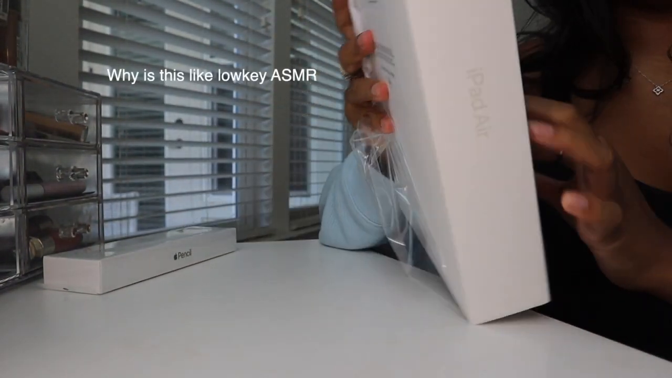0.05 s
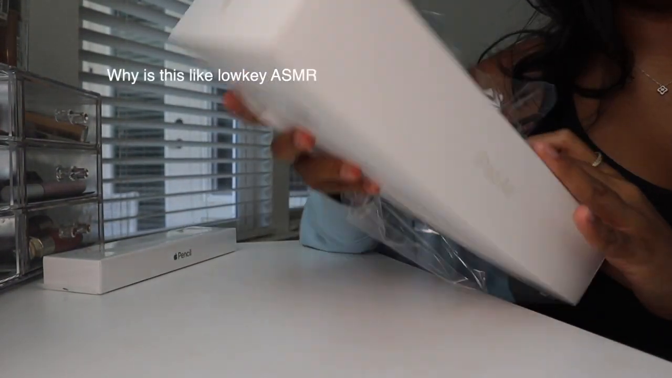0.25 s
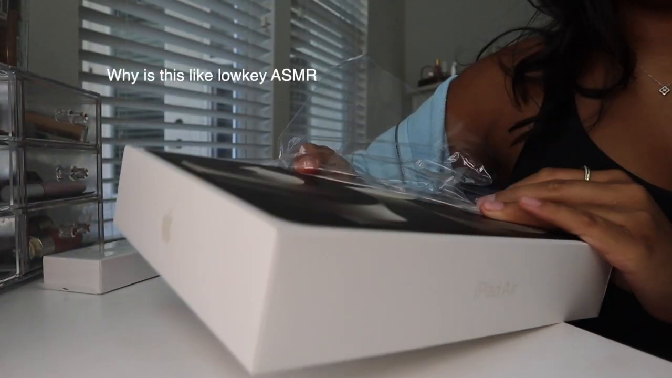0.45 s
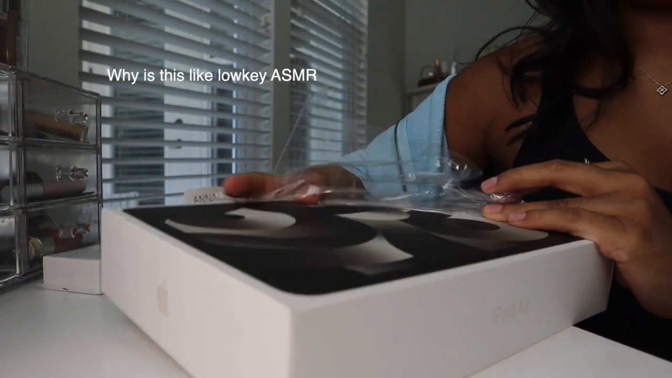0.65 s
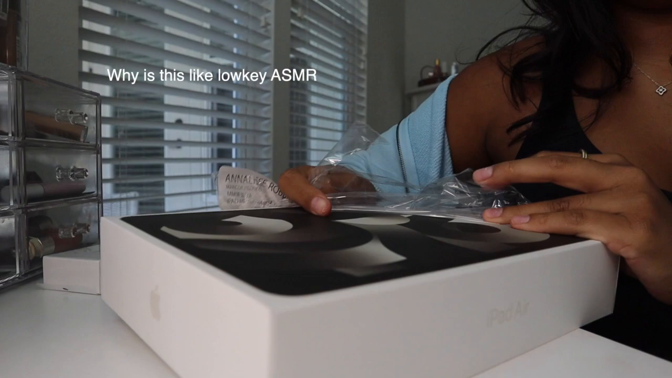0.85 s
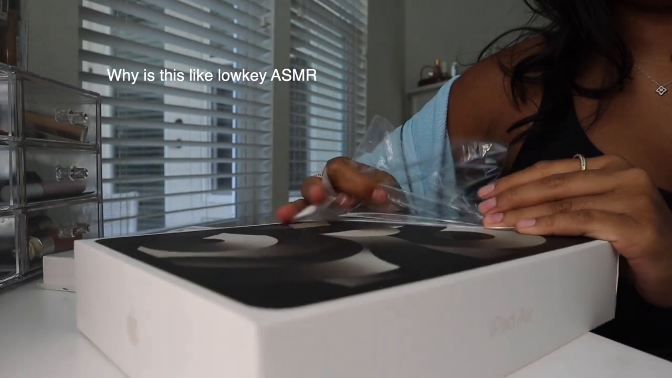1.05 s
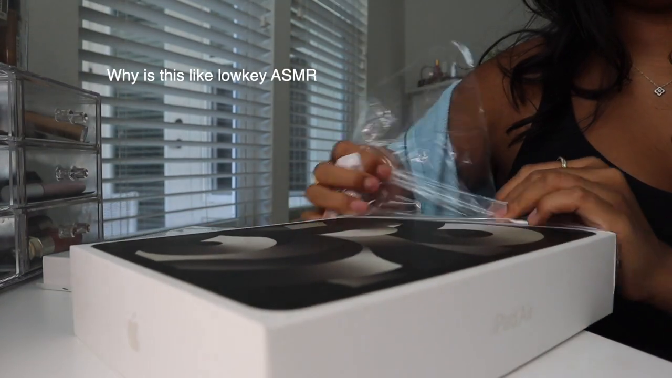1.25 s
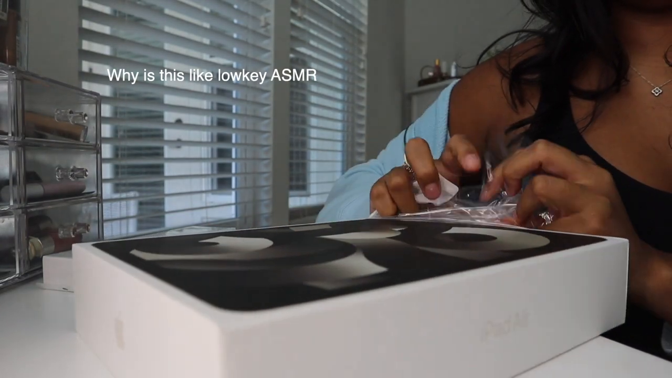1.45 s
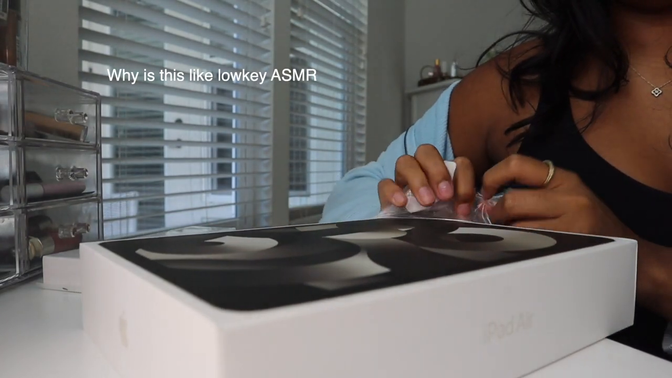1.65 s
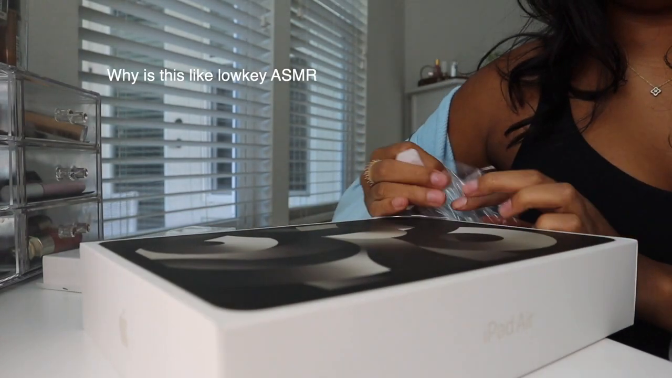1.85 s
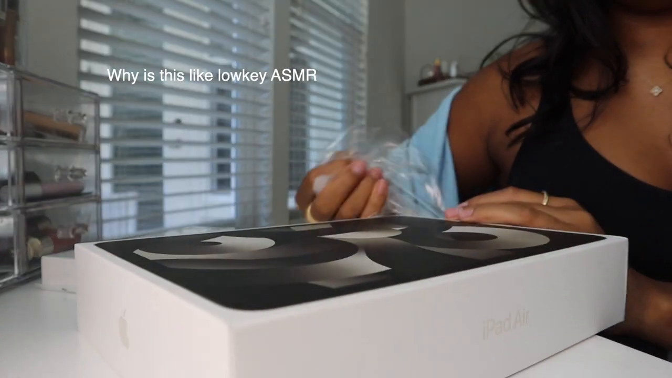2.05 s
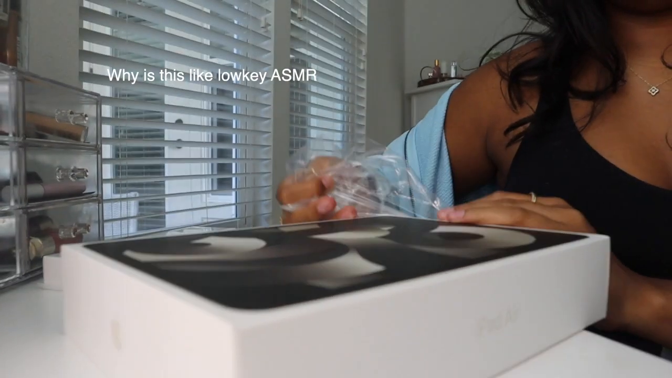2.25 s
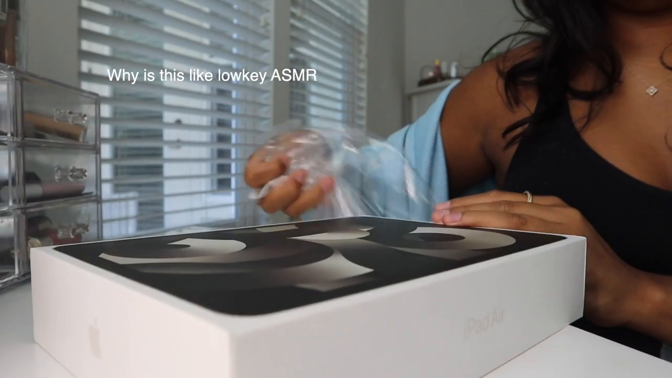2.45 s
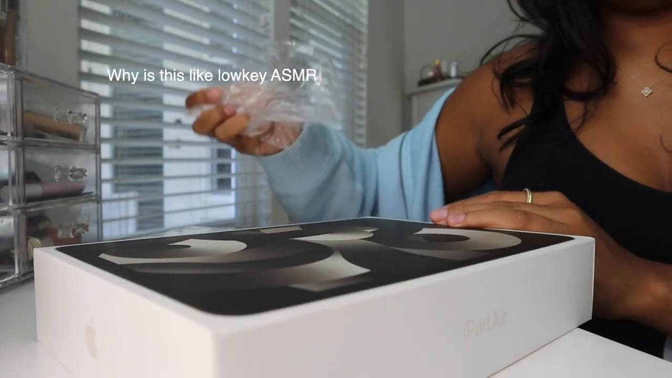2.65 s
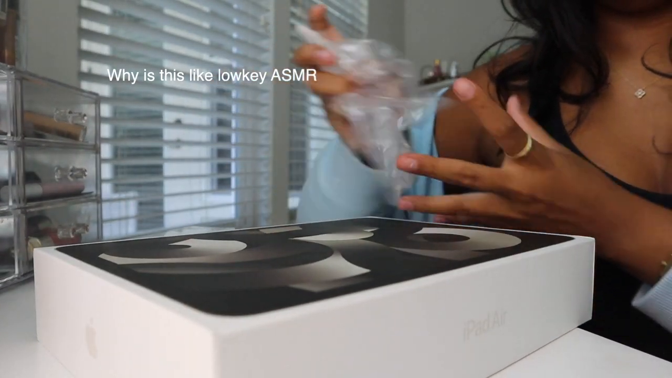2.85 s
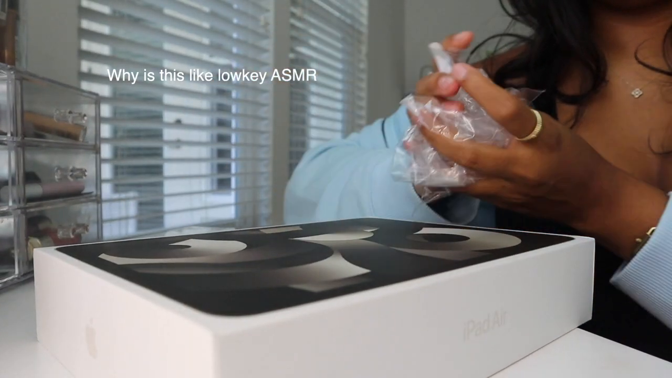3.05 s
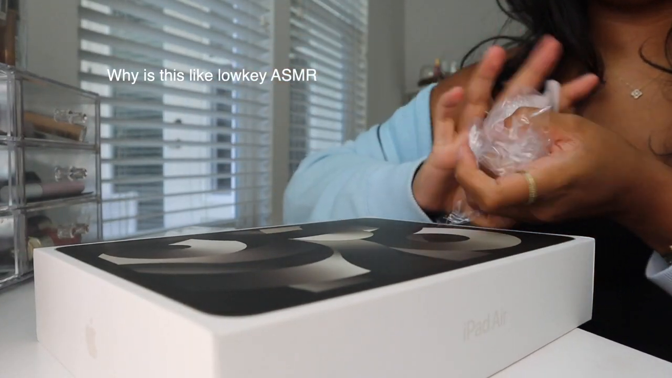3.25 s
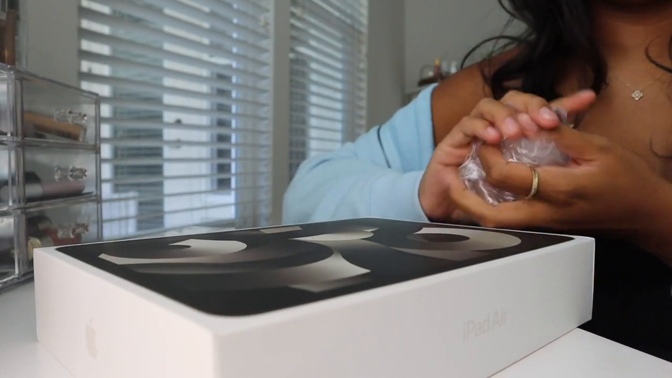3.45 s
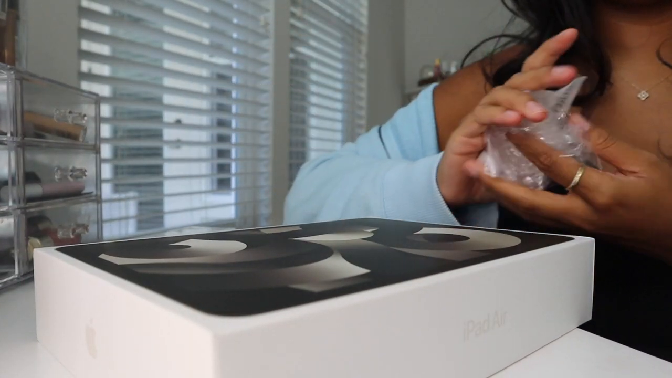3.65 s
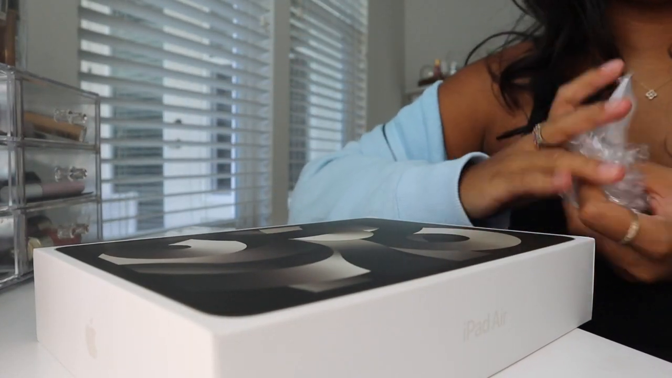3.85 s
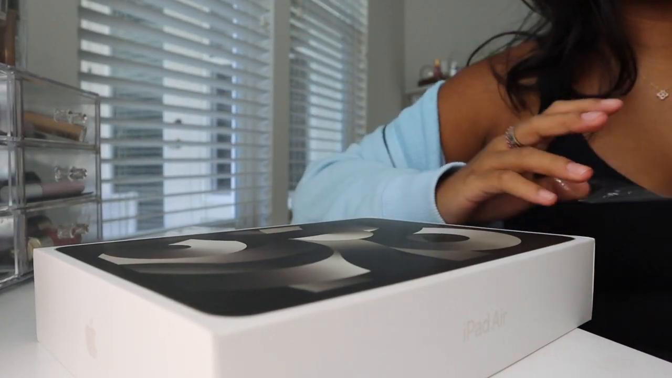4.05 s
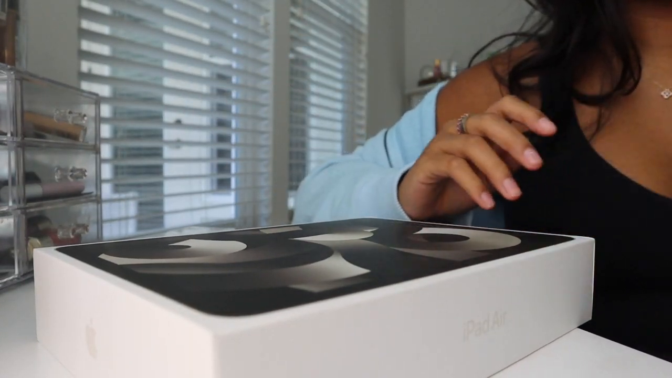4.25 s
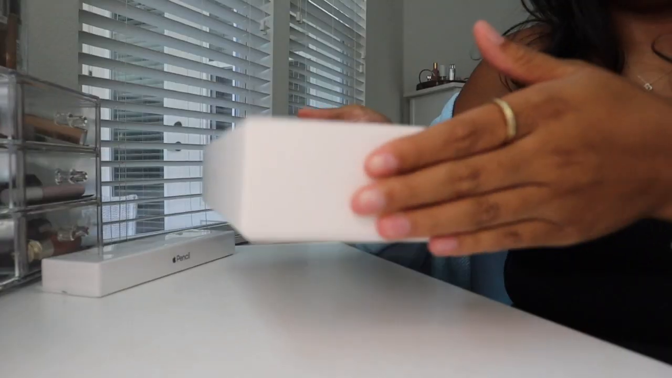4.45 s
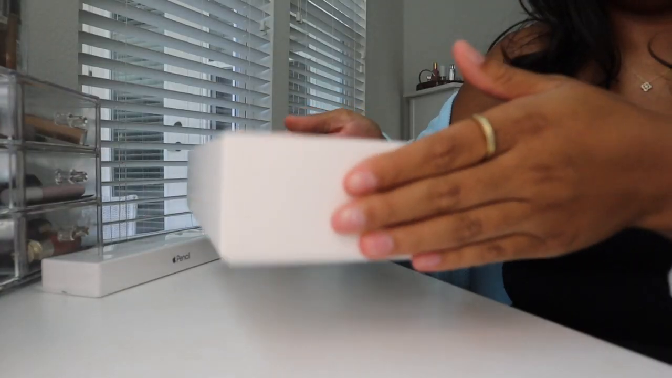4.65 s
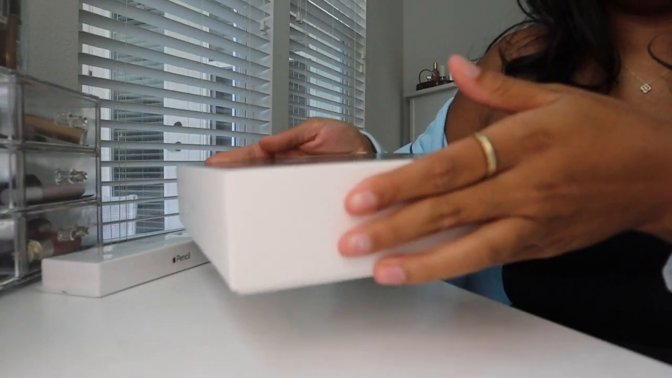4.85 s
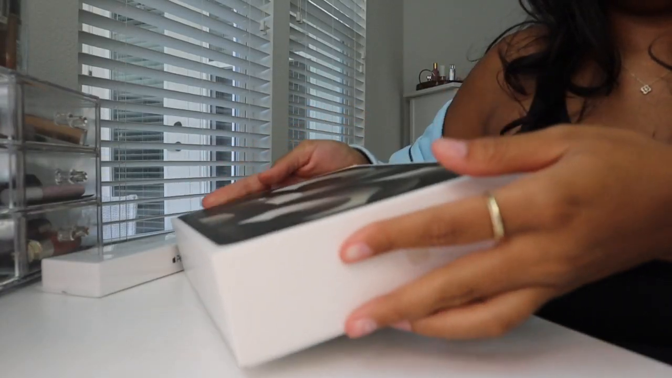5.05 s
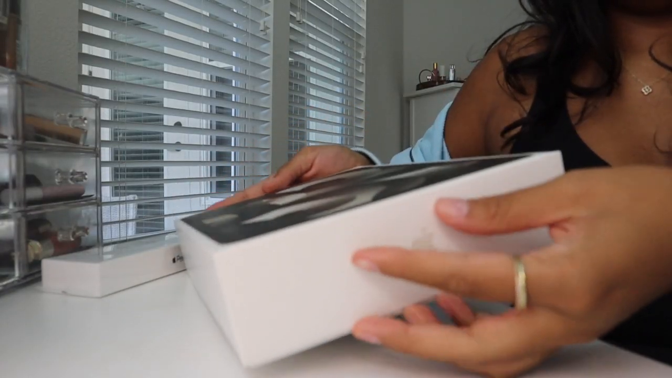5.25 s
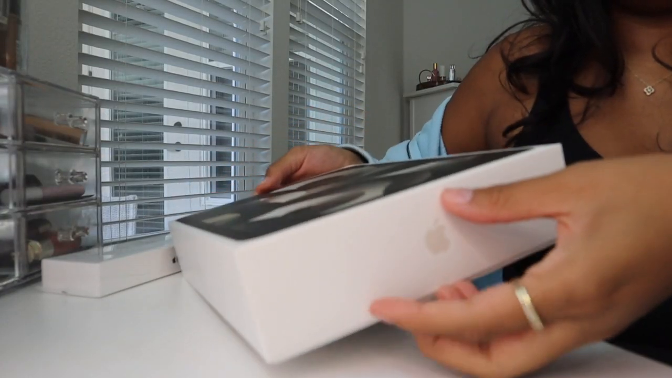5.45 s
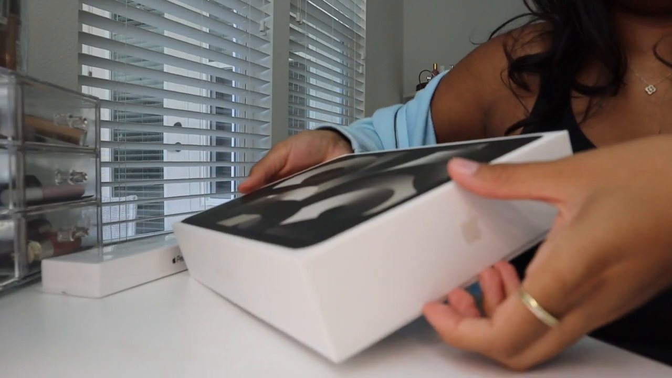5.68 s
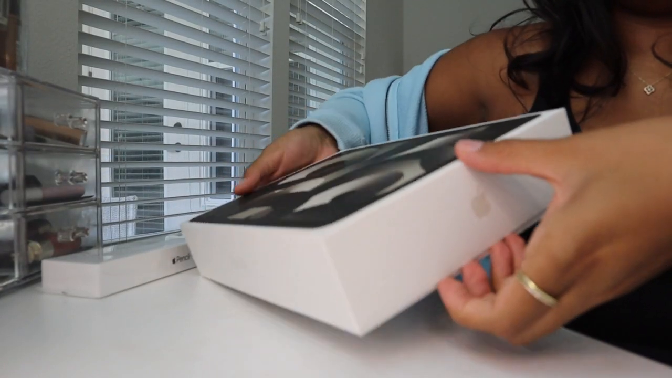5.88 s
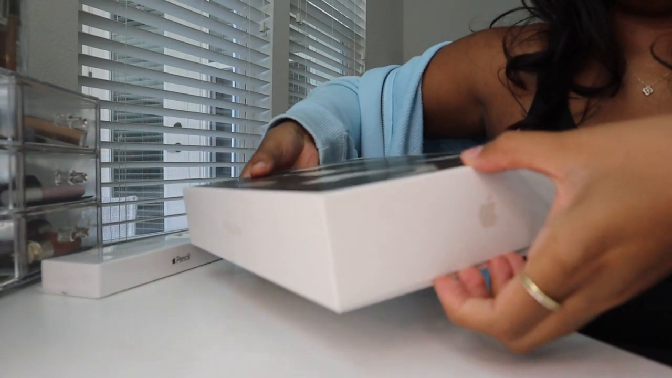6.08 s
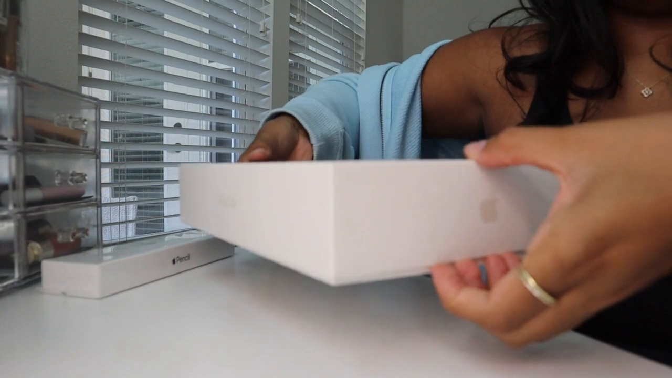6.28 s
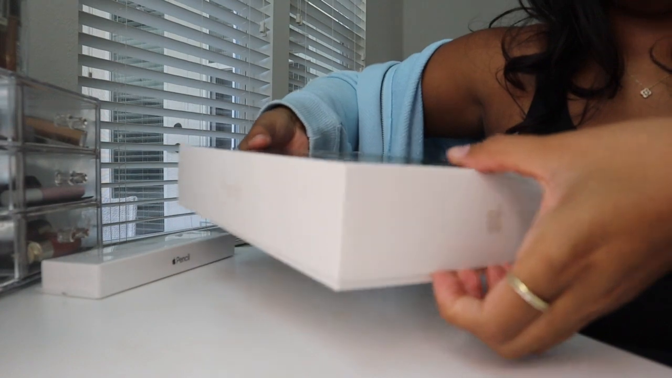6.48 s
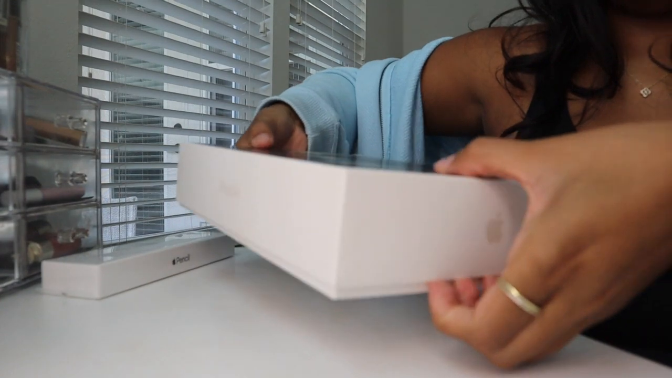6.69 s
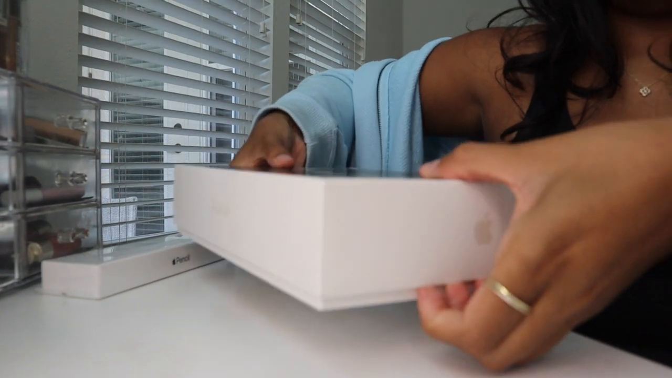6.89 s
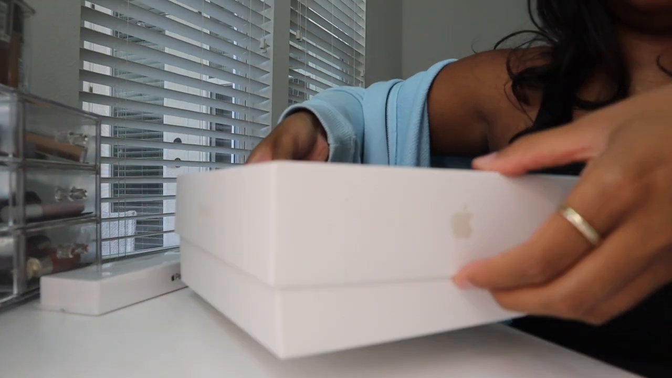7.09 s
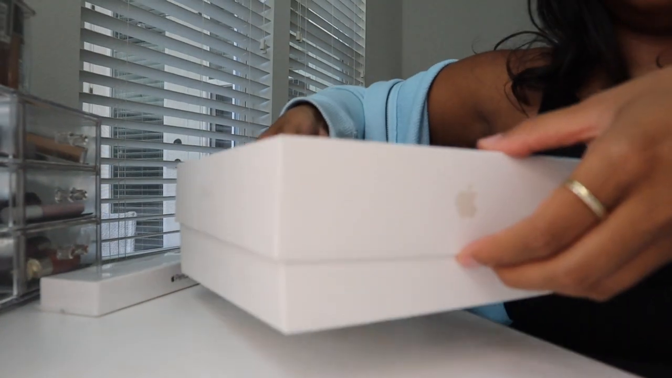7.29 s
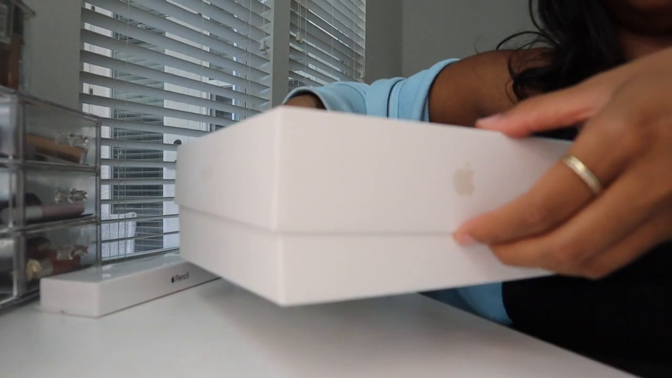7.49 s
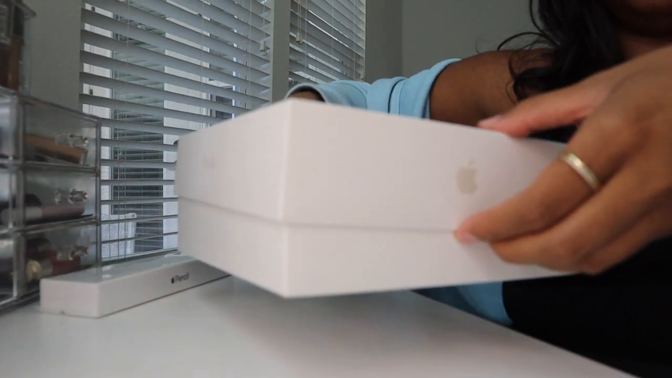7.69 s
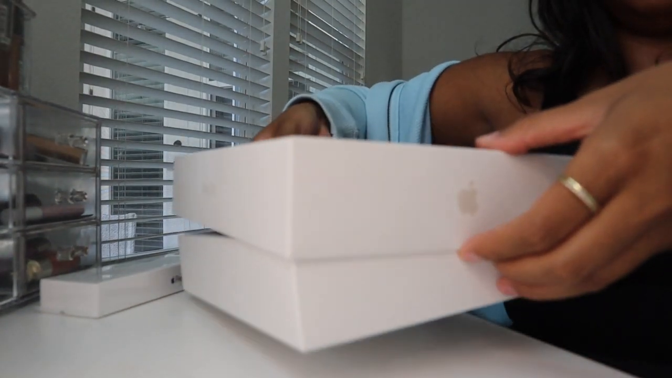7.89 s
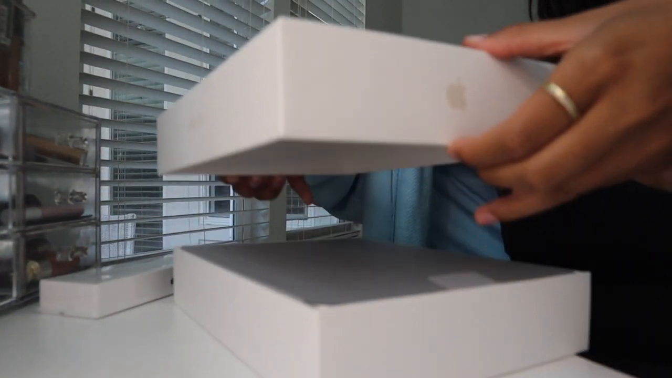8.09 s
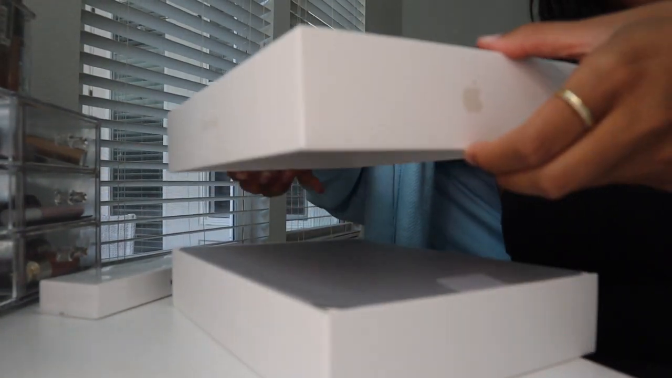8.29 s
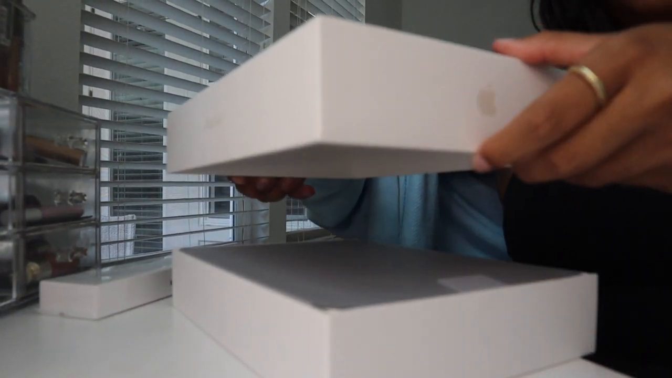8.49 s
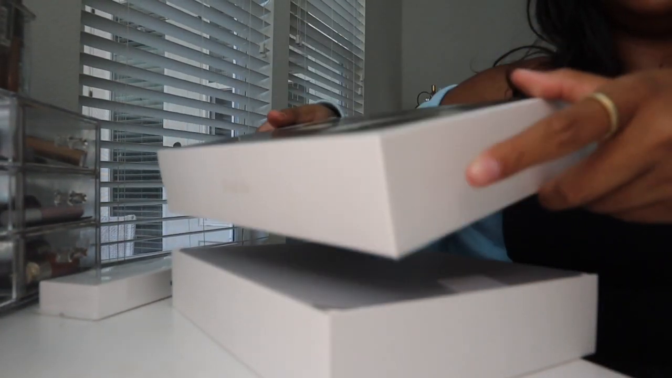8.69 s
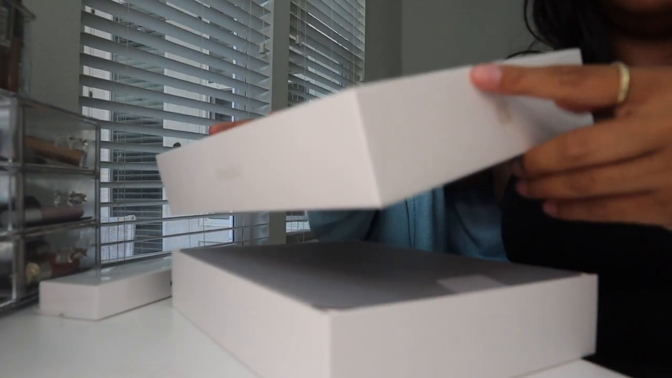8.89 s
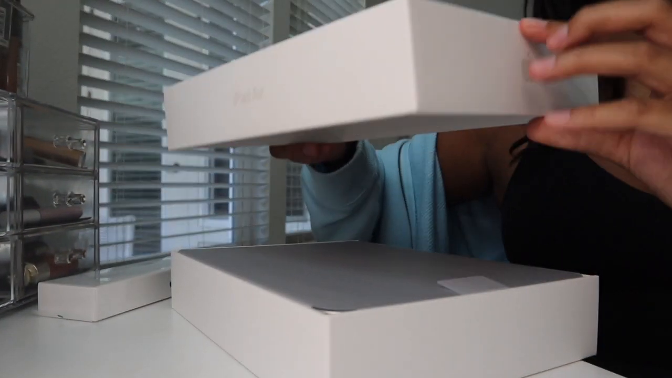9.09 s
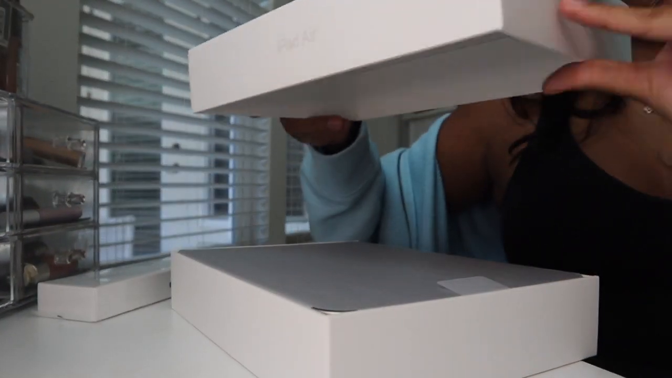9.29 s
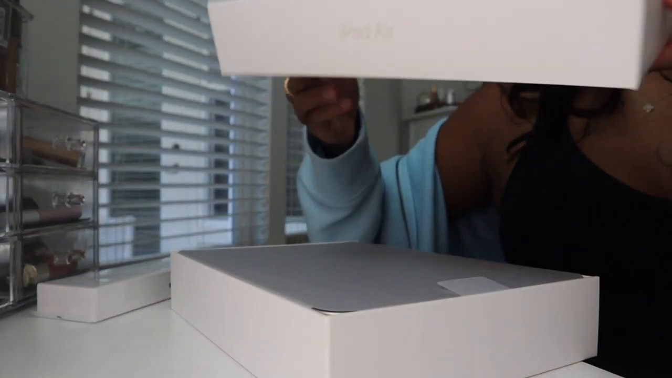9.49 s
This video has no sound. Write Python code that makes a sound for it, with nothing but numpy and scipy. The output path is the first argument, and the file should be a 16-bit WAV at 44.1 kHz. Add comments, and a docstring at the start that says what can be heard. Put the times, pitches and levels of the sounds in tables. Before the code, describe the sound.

Bright, uneven crinkling in bursts with sharp clicks and early boxy thuds, then denser crunching as the film is squeezed up. After it stops, hollow card knocks and quiet skin brushing, a near-silent pause, a low stuttering creak, and a loud scraping clunk onto the desk. Light card swishes fade into quiet room tone. Close stereo pickup, small indoor room, short reverberation.

```python
"""Close to a stereo camera microphone in a small room, plastic wrap is pulled off a cardboard box on a desk:
filtered random impulses crackle, snaps click and shiver, and damped modes knock as the box is turned.
The film is balled up and put aside; more knocks follow, and fingers brush the card in fine grains.
Then the tray squeaks and creaks down the lid by stick and slip, scrapes free, drops on the desk and skids.
Light swishes and a last brush of the fingers close it; dull air and a fan hum lie behind it all."""
import sys
import numpy as np
from scipy import signal
from scipy.fft import rfft, irfft, next_fast_len
from scipy.io import wavfile
from scipy.ndimage import uniform_filter1d

SR = 44100
rng = np.random.default_rng(int(sys.argv[2]) if len(sys.argv) > 2 else 0)


def generate_wav(signal):
    """Clip the signal to [-1, 1] and save it as 16-bit WAV at the path in sys.argv[1]."""
    frames = np.transpose(np.atleast_2d(signal))
    scaled = np.clip(frames, -1, 1) * 32767
    pcm = np.round(scaled).astype(np.int16)
    wavfile.write(sys.argv[1], SR, pcm)


N = 420273
T = np.arange(N) / SR
RING = T[:SR // 2]  # time axis of one blow or room tail
RING_HZ = np.arange(len(RING) // 2 + 1) * SR / len(RING)
PUT_ASIDE_S = 4.38  # the film is put aside

# colour of small creases in the film: [f/Hz, level/dB]
CREASE_COLOUR = [(900, -22), (2000, -2.5), (3000, -2), (4100, 0.5), (6200, -3), (8500, -4.5), (11000, -2),
                 (12500, -4.5), (14000, -22), (15500, -52)]
# colour of large folds in the film: [f/Hz, level/dB]
FOLD_COLOUR = [(300, -8.5), (600, 0.5), (1000, 3.5), (1400, 3.5), (2000, -5.5), (3000, -17), (6000, -42.5)]
# loud snaps of the film: [t/s, level/dB before the gain of clicks(), body re treble/dB before its
# body_db, ring of the buckling facet f/Hz]
FILM_SNAPS = [(0.1026, -13, -9, 2960), (0.2999, -13.5, -11, 2300), (0.4032, -13, -8, 1740),
              (0.507, -6, -19, 3960), (0.5761, -18, -20, 10100), (0.9258, -15, -34, 5850),
              (1.104, -10, -24, 4400), (1.156, -14.5, -14, 4200), (1.245, -19, -19.5, 4700),
              (1.257, -19, -2.5, 2320), (1.365, -2, -15, 5410), (1.494, -17, -29, 3860),
              (1.5817, -7, -10.5, 2220), (1.6754, -16.5, -9, 2850), (1.933, -12, -5.5, 4300),
              (1.958, -7, -2, 4100), (1.9908, -6, -6.5, 2540), (2.0609, -19.5, -2, 4000),
              (2.3129, -2, -5, 3300), (2.373, -12, 0, 2270), (2.5221, -12, -8, 4170),
              (2.7782, -18, -6, 2310), (2.795, -8, -4.5, 2320), (2.8205, -16, -17, 2500),
              (2.983, -15, -18, 3150), (3.285, -8, -15.5, 5450), (3.3502, -15, -23, 3100),
              (3.505, -5.5, -16, 4260), (3.5743, -10.5, -14, 4000), (3.7897, -15, -22, 2050),
              (3.8586, -17, -12, 2200), (4.2748, -11.5, -19, 3950), (4.2933, -13, -1, 3900),
              (4.3065, -9.5, -4, 2200)]
# knocks on the box: [t/s, level/dB, centre of the blow f/Hz, desk thump/dB and card clack/dB before
# the layer levels of knocks(), ring time factor of the hollow (less when gripped)]
BOX_KNOCKS = [(0.026, -14.5, 355, 1.5, -21, 1.1), (0.273, -20, 342, -34, -27, 1.1),
              (0.427, -1, 368, -12, -4.5, 1.35), (0.633, -2, 420, -22, -5, 0.8),
              (1.004, -13, 360, -13.5, -33, 0.77), (1.326, -21.5, 220, -13, -14, 1),
              (1.971, -19, 500, -21.5, -3.5, 0.8), (2.122, -21, 410, -23, -5, 0.36),
              (2.518, -13.5, 397, -7, -17, 0.93), (3.516, -21.5, 376, -3, -16, 1.3),
              (4.393, -16.5, 590, -26, 1.5, 0.56), (4.4249, -10, 350, -41, -17, 0.39),
              (4.438, -9.5, 290, -28, -32, .8), (4.463, -17.5, 302, -34, -33, 0.55),
              (4.556, -19, 364, -30, -14, 1), (4.578, -11, 444, -23, -28, 0.82),
              (4.681, -22, 620, -22, -2, 0.81), (5.0869, 0.5, 324, -16.5, -15, 0.98),
              (5.245, -34, 600, -24, -2, 0.5), (5.3058, -2, 286, -15.5, -17, 0.96),
              (5.533, -24, 556, -15, -7, 0.81), (6.825, -21.5, 530, -23, 5, 0.62),
              (7.9844, -1, 420, -16, 2, 0.54), (7.993, -8, 260, -13, -24, .5),
              (8.0227, -3, 480, -20, -3, 0.45), (8.082, -9, 260, -6, -20, 0.88),
              (8.132, -18, 330, -9, -13, 1.3)]
# colour of card scraping on card: [f/Hz, level/dB]
SCRAPE_COLOUR = [(70, -6), (130, 2), (250, -3), (500, 4), (700, -5.5), (1050, -12), (1400, -13),
                 (2300, -16.5), (5000, -31), (12000, -56)]


def undb(db):
    """Decibels to gain."""
    return 10 ** (np.asarray(db) / 20)


def unit(x):
    """Scale to rms 1."""
    return x / np.sqrt(np.mean(x ** 2) + 1e-18)


def crest(x):
    """Scale to peak 1."""
    return x / np.abs(x).max()


def curve(table, axis):
    """One column of a control table at every sample."""
    rows = np.array(table)
    return np.interp(T, rows[:, 0], rows[:, axis])


def during(table):
    """A soft gate over the time that a table covers."""
    inside = (T >= table[0][0]) & (T <= table[-1][0])
    return uniform_filter1d(1. * inside, SR // 50)


def at(points, hz):
    """Read (Hz, value) points on a log-frequency axis."""
    f, value = np.transpose(points)
    return np.interp(np.log(hz + 1e-9), np.log(f), value)


def colour(x, points, size=4096):
    """Causal minimum-phase filter with the given (Hz, dB) response."""
    gain = undb(at(points, np.arange(size // 2 + 1) * SR / size))
    # folding the cepstrum forward makes the response causal
    cepstrum = irfft(np.log(gain))
    cepstrum[1:size // 2] *= 2
    cepstrum[size // 2 + 1:] = 0
    response = irfft(np.exp(rfft(cepstrum)))
    return signal.fftconvolve(x, response)[:len(x)]


def fade(t60):
    """Exponential decay, 60 dB down after t60 seconds."""
    return np.exp(-np.log(1000) * RING / max(t60, 1e-4))


def burst(t60):
    """Noise that dies away."""
    return rng.standard_normal(len(RING)) * fade(t60)


def add(track, s, sound):
    """Mix a sound into a track at time s."""
    i = max(int(s * SR), 0)
    track[i:i + len(sound)] += sound[:N - i]


def walk(rate):
    """Slow random wander with a spread near 1, from steps at rate a second, smoothed twice."""
    k = int(SR / rate)
    steps = np.repeat(rng.standard_normal(N // k + 1), k)
    return 1.3 * uniform_filter1d(uniform_filter1d(steps, k), k)[:N]


def slips(rate, spread_db):
    """Random impulses of either sign, about rate a second: many small, a few large."""
    size = undb(spread_db * np.minimum(rng.exponential(size=N), 4))
    return unit((rng.random(N) < rate / SR) * size * rng.choice([-1, 1], N))


def effort(moves):
    """Power of hand moves (start s, length s, dB): each swells, holds and dies away."""
    attack_s, release_t60_s = 0.0067, 0.18
    power = np.zeros(N)
    for s, length, db in moves:
        swell = np.clip((T - s) / attack_s, 0, 1)
        release = np.exp(-np.log(1000) * np.clip((T - s - length) / release_t60_s, 0, 2))
        power += (undb(db) * swell * release) ** 2
    return power


def blow(smear_s, shiver_db, shiver_t60):
    """A crack with each pitch arriving at its own time, and the short shiver of the sheet after it."""
    knots = np.geomspace(200, SR / 2, 28)
    delay = smear_s * (.5 + np.interp(RING_HZ, knots, rng.exponential(size=len(knots))))
    # the running sum of delay over frequency is the phase of an even spectrum
    phase = 2 * np.pi * np.cumsum(delay) * RING_HZ[1]
    crack = irfft(np.exp(-1j * phase), len(RING)) * fade(.1)
    shiver = burst(shiver_t60) * (1 - np.exp(-RING / smear_s))
    return crack + undb(shiver_db) * shiver / np.linalg.norm(shiver)


def ring(modes, weights, scatter, rise_s):
    """Damped modes that build up during the contact, their pitches a little different at every blow."""
    waves = []
    for hz, db, t60 in modes:
        pitch = hz * (1 + scatter * rng.standard_normal())
        waves.append(undb(db) * fade(t60) * np.sin(2 * np.pi * pitch * RING))
    total = (np.reshape(weights, (-1, 1)) * waves).sum(axis=0)
    return crest(total * (1 - np.exp(-RING / rise_s)))


def crinkle():
    """Film buckles in little avalanches of creases; wad and large folds sound lower; taut film drags."""
    # pulls that peel the film off: [t/s, length/s, level/dB, low folds and drag re that level/dB]
    pull_moves = [(0.0, 0.045, -28, 1), (0.085, 0.015, -29, 6), (0.12, 0.048, -48, 17),
                  (0.235, 0.11, -44, 3), (0.5, 0.087, -33.5, 5), (0.62, 0.14, -42.5, 4),
                  (0.925, 0.088, -38, 1), (1.04, 0.19, -37, 4), (1.24, 0.26, -35, 5.5),
                  (1.55, 0.41, -36.5, 6), (1.88, 0.2, -37, 2.5), (2.08, 0.098, -40, 5),
                  (2.2, 0.1, -41.5, 2.5), (2.305, 0.25, -35.5, 2.5), (2.46, 0.15, -35, -16),
                  (2.5, 0.047, -28, 2.5), (2.725, 0.041, -36, -5.5), (2.775, 0.076, -35.5, -1.5)]
    # squeezes that ball it up: [t/s, length/s, level/dB, low folds and drag re that level/dB]
    squeeze_moves = [(2.893, 0.15, -37.5, 1), (2.97, 0.19, -33.5, 6), (3.182, 0.056, -36.5, -1.5),
                     (3.234, 0.078, -32.5, -4), (3.333, 0.081, -34, 2.5), (3.427, 0.18, -30, -0.5),
                     (3.684, 0.23, -33.5, -6), (3.901, 0.13, -31.5, 3), (4.075, 0.053, -33, 0),
                     (4.143, 0.15, -38.5, -19), (4.256, 0.04, -30, 0.5)]
    # colour of the wad's crunch: [f/Hz, level/dB]
    wad_colour = [(700, -15), (1400, -3.5), (1800, -0.5), (2300, -1.5), (2900, -7.5), (4000, -11),
                  (8000, -41)]
    # colour of film dragging on the box: [f/Hz, level/dB]
    drag_colour = [(50, -11), (110, 5), (190, 0), (250, -6.5), (380, 3), (520, 3.5), (720, -13),
                   (1500, -51.5)]
    slack_db = -46.5  # between moves the crumpled film keeps relaxing, until it is put aside
    pop_db = -6.5  # lesser snaps relative to the creases

    pull, squeeze = [effort([(s, length, db) for s, length, db, low in moves])
                     for moves in (pull_moves, squeeze_moves)]
    low_pull, low_squeeze = [effort([(s, length, db + low) for s, length, db, low in moves])
                             for moves in (pull_moves, squeeze_moves)]
    slack = undb(slack_db) ** 2 * uniform_filter1d(1. * (T < PUT_ASIDE_S), SR // 50).clip(0)

    def drive(pulling, pull_db, squeezing, squeeze_db):
        """Gain of one layer from its shares of the pulls and the squeezes."""
        return np.sqrt((pulling + slack) * undb(pull_db) ** 2 + squeezing * undb(squeeze_db) ** 2)

    avalanche = unit(undb(2.5 * walk(170) + 1.6 * walk(30)))
    creases = slips(rate=3600, spread_db=4.5) * avalanche
    # creases of different size ring in different bands, so the colour changes from click to click
    high = creases
    for hz in 2500 * 1.7 ** np.arange(4):
        band = signal.lfilter(*signal.iirpeak(hz, 2, SR), slips(rate=1200, spread_db=4.5))
        high = high + 1.44 * band * unit(undb(3 * walk(110) + 1.5 * walk(25)))
    high = unit(unit(colour(high, CREASE_COLOUR)) + undb(pop_db) * pops())
    high = high * np.sqrt(pull + squeeze + slack)

    wad = unit(colour(creases + 1.6 * slips(rate=1000, spread_db=1.5) * avalanche, wad_colour))
    folds = unit(colour(creases + 1.46 * slips(rate=900, spread_db=4.0) * avalanche, FOLD_COLOUR))
    drag = unit(colour(slips(rate=600, spread_db=5.5), drag_colour))
    low = wad * drive(pull, -8.5, squeeze, -3)
    low = low + folds * drive(low_pull, -10.5, low_squeeze, -9)
    low = low + drag * drive(low_pull, -8, low_squeeze, -13.5)
    return high, low


def pops():
    """Flurries of lesser snaps until the film is put aside, each with its own colour and strength."""
    tries_per_s, spread_db, middle_hz = 70, 4, 3580
    out, flurry = np.zeros(N), walk(16)
    for when, pitch, size, luck in rng.random((int(tries_per_s * PUT_ASIDE_S), 4)):
        s = when * PUT_ASIDE_S
        hz = min(middle_hz * 2.2 ** (2 * pitch - 1), SR / 4)
        tint = signal.iirpeak(hz, 1.1, SR)
        pop = crest(signal.lfilter(*tint, burst(0.0035)[:SR // 50]))
        sounds = flurry[int(s * SR)] > luck - .5
        add(out, s, pop * undb(spread_db * min(-np.log(size), 2)) * sounds)
    out = colour(out, CREASE_COLOUR)
    return out / np.sqrt(np.mean(out[T < PUT_ASIDE_S] ** 2))


def clicks(table, smear_s, shiver_db, shiver_t60, gain_db, body_db):
    """A sharp release and a short shiver, with a bright part, a ring of its own and a low part."""
    facet_db = -7  # the facet's ring against the broad click
    out = np.zeros(N)
    for s, db, body, hz in table:
        push = blow(smear_s, shiver_db, shiver_t60)
        broad = crest(colour(push, CREASE_COLOUR))
        bright = crest(broad + undb(facet_db) * crest(facet(push, hz)))
        low = crest(colour(blow(smear_s, shiver_db, shiver_t60), FOLD_COLOUR))
        add(out, s, undb(db + gain_db) * (bright + undb(body + body_db) * low))
    return out


def facet(x, hz):
    """The brief ring of a small stiff patch of film or card."""
    sharpness = 2.6
    return signal.lfilter(*signal.iirpeak(min(hz, SR / 3), sharpness, SR), x)


def knocks(reach=0.38, panel_db=1, hollow_db=-10, desk_db=4, clack_db=1, low_cut_hz=60):
    """A knock, or jolt from a snap, excites panel and hollow near its centre, thumps desk, clacks card."""
    # modes of the panel that takes the blow: [f/Hz, level/dB, t60/s]
    panel_modes = [(199, -5.5, 0.081), (330.3, 1.5, 0.032), (426, 1, 0.027), (573, -5, 0.016)]
    # modes of the hollow box: [f/Hz, level/dB, t60/s before the ring time factor]
    box_modes = [(185.3, 1.5, 0.2), (221.2, -1, 0.24), (271.7, -2.5, 0.18), (313, -7.5, 0.12),
                 (348.6, -3.5, 0.12), (383.5, -1, 0.23), (436, -0.5, 0.15), (462, -2, 0.12),
                 (526, -2.5, 0.15), (589, 0.5, 0.13)]
    # modes of the desk: [f/Hz, level/dB, t60/s]
    desk_modes = [(85.2, -3, 0.092), (102.5, 3, 0.096), (121.8, -11.5, 0.36), (185.8, -17.5, 0.32)]
    # colour of the dull card clack: [f/Hz, level/dB]
    card_colour = [(250, -28.5), (500, 2.5), (750, 3), (1400, -3), (2800, -13), (6000, -31.5), (12000, -39)]
    film_free_s = 2.65  # the film leaves the box; later snaps no longer jolt it
    # a jolt against the snap's body, its centre, and its thump and clack before the layer levels
    jolt_db, jolt_hz, jolt_thump_db, jolt_clack_db = -6.5, 420, -16, 0

    jolts = [(s, db + body + jolt_db, jolt_hz, jolt_thump_db, jolt_clack_db, 1)
             for s, db, body, hz in FILM_SNAPS if s < film_free_s]

    def near(modes, hz):
        """Weight of each mode by its closeness to the centre of the blow."""
        return 1 / (1 + (np.log(np.array(modes)[:, 0] / hz) / reach) ** 2)

    out = np.zeros(N)
    for s, db, hz, thump, clack, freedom in [*BOX_KNOCKS, *jolts]:
        panel = ring(panel_modes, near(panel_modes, hz), scatter=0.026, rise_s=0.001)
        swing = rng.choice([-1, 1], len(box_modes))  # where the blow lands sets the way each mode starts
        gripped = np.array(box_modes) * [1, 1, freedom]
        hollow = ring(gripped, swing * near(box_modes, hz), scatter=0.0074, rise_s=0.014)
        desk = ring(desk_modes, 1, scatter=0.013, rise_s=0.0094)
        card = crest(colour(blow(smear_s=0.001007, shiver_db=1, shiver_t60=0.02), card_colour))
        knock = undb(panel_db) * panel + undb(hollow_db) * hollow
        knock = knock + undb(thump + desk_db) * desk + undb(clack + clack_db) * card
        add(out, s, undb(db) * knock)
    return signal.sosfilt(signal.butter(2, low_cut_hz, "high", fs=SR, output="sos"), out)


def creak(rasp_db=-14, rasp_share=0.12, rub_db=-18):
    """The tight tray sticks and slips down the lid; each slip jerks and rasps, ringing the walls."""
    # the tray creaks inside the lid: [t/s, slips a second, level/dB]
    creak_path = [(7.32, 53, -34.5), (7.36, 48, -35.5), (7.42, 56, -34.5), (7.52, 64, -37.5),
                  (7.67, 60, -37), (7.70, 81, -40.5), (7.73, 67, -43)]
    # modes of the lid walls: [f/Hz, level/dB, t60/s]
    lid_modes = [(172, -2, 0.056), (306, -5, 0.045), (450, 1, 0.024), (566, 1.5, 0.039), (672, -4, 0.021),
                 (990, -4, 0.02), (1630, -11, 0.013), (2610, -9.5, 0.0037)]
    phase = np.cumsum(curve(creak_path, 1) * (1 + .025 * walk(60))) / SR  # in slips
    jerks = unit(np.diff(np.floor(phase), prepend=0) * undb(1.1 * walk(60)))
    rasp = unit(rng.standard_normal(N) * np.exp(-(phase % 1) / rasp_share))
    swing = (-1) ** np.arange(len(lid_modes))  # neighbouring modes start in opposite directions
    lid = ring(lid_modes, swing, scatter=0.0027, rise_s=0.00015)
    walls = unit(signal.fftconvolve(jerks + undb(rasp_db) * rasp, lid)[:N])
    rub = unit(colour(rng.standard_normal(N), SCRAPE_COLOUR))
    return (walls + undb(rub_db) * rub) * undb(curve(creak_path, 2)) * during(creak_path)


def slide():
    """Dense slips of card on card as the tray scrapes out and slides on the desk."""
    # course of the slide: [t/s, level/dB]
    slide_path = [(7.89, -48), (7.925, -28.5), (8.05, -40), (8.15, -32.5), (8.21, -52), (8.3, -64)]
    grip = slips(rate=3700, spread_db=3.0) * undb(2.3 * walk(70))
    return unit(colour(grip, SCRAPE_COLOUR)) * undb(curve(slide_path, 1)) * during(slide_path)


def skid():
    """The card bottom of the dropped tray chatters over the smooth desk as it skids to rest."""
    # skids: [t/s, length/s, level/dB]
    skid_moves = [(7.99, 0.18, -39.5), (8.2, 0.12, -48.5)]
    # colour of card on the desk: [f/Hz, level/dB]
    skid_colour = [(400, -18), (700, -3), (1000, 8), (1400, -7), (2200, -25), (5000, -48)]
    chatter = slips(rate=2200, spread_db=3.0) * undb(3.5 * walk(60))
    return unit(colour(chatter, skid_colour)) * np.sqrt(effort(skid_moves))


def squeaks():
    """Film or card squeaks when its slips lock onto one pitch: short rough tones of unsteady pitch."""
    # squeaks: [t/s, length/s, f/Hz, level/dB, roughness 0-1]
    squeak_table = [(2.75, 0.1, 2330, -34, 0.13), (3.699, 0.098, 2000, -40, 0.15),
                    (7.008, 0.043, 581, -35, 0.13), (7.306, 0.04, 581, -31, 0.09),
                    (7.722, 0.07, 601, -32.5, 0.08)]
    out = np.zeros(N)
    for s, length, hz, db, rough in squeak_table:
        n = int(length * SR)
        waver = walk(600)[:n]
        turn = 2 * np.pi * np.cumsum(hz * (1 + rough * (waver - waver.mean()))) / SR
        tone = np.sqrt(2) * signal.windows.tukey(n, .7) * np.sin(turn)
        add(out, s, undb(db) * tone)
    return out


def brush():
    """Skin drags over the matt card in fine grains."""
    # fingers change grip on the card: [t/s, length/s, level/dB]
    brush_moves = [(4.4, 0.16, -52), (4.82, 0.2, -59.5), (5.32, 0.34, -57), (5.72, 0.17, -56),
                   (9.02, 0.61, -67)]
    # colour of skin on card: [f/Hz, level/dB]
    skin_colour = [(500, -32), (1000, 1), (2300, -7.5), (4500, -11.5), (8000, -16.5), (11500, -16.5),
                   (15000, -33)]
    holding_db = -67  # while the fingers hold the card
    pressure = np.sqrt(effort(brush_moves) + undb(holding_db) ** 2 * (T > PUT_ASIDE_S))
    grains = slips(rate=4700, spread_db=5.5) * undb(2 * walk(35))
    return unit(colour(grains, skin_colour)) * pressure


def swishes():
    """Smooth card and sleeve glide with a fine, bright grain as the lid comes off."""
    # light swishes: [t/s, length/s, level/dB]
    swish_moves = [(7.91, 0.041, -51), (8.5, 0.14, -62.5), (8.65, 0.12, -55.5), (8.85, 0.44, -61.5)]
    # colour of card and cloth gliding: [f/Hz, level/dB]
    swish_colour = [(1000, -9), (2500, -3), (4500, 2), (8000, 0.5), (11500, -5), (14000, -18)]
    grains = slips(rate=7200, spread_db=4.5) * undb(1.4 * walk(30))
    return unit(colour(grains, swish_colour)) * np.sqrt(effort(swish_moves))


def room_tone():
    """Dull steady air as mid and side, and a wavering fan hum in the middle."""
    # spectrum of the air: [f/Hz, relative level per Hz/dB]
    air_colour = [(25, -13), (54, -1.5), (101, -5.5), (154, -4.5), (237, -13), (354, -9.5), (811, -21.5),
                  (1350, -26.5), (4870, -40), (8550, -49), (11200, -71), (15000, -95)]
    # hum of a fan: [f/Hz, level/dB]
    fan_hum = [(150.7, -47), (183, -55), (355.3, -55.5)]
    air_db = -43
    air = np.array([unit(colour(rng.standard_normal(N), air_colour)) for _ in range(2)]) * undb(air_db)
    for hz, db in fan_hum:
        tone = np.sin(2 * np.pi * hz * T + 0.55 * walk(12))
        air[0] += np.sqrt(2) * undb(db + 2 * walk(8.2)) * tone
    return air


def room(x, wet_db, side_db, bearing):
    """Mid and side of a source with the room's tail; the sign of bearing says which capsule leads."""
    # decay of the room: [f/Hz, t60/s]
    room_decay = [(150, 0.37), (500, 0.37), (2000, 0.3), (6000, 0.18), (14000, 0.16)]
    centres = 125 * 2. ** np.arange(8)  # octave bands, Hz
    tails = np.zeros((2, len(RING)))
    noise = rfft(rng.standard_normal(tails.shape))
    for centre, share in zip(centres, np.eye(len(centres))):
        band = irfft(noise * at(np.c_[centres, share], RING_HZ), len(RING))
        tails += band * fade(at(room_decay, centre))
    tails *= 1 - np.exp(-RING / 0.0003)
    tails *= undb(wet_db) / np.linalg.norm(tails[0])
    mid, side = signal.fftconvolve(x[None], tails, axes=1)[:, :N]
    # the difference between two close capsules lies a quarter cycle from their sum
    difference = bearing * signal.hilbert(x, next_fast_len(N))[:N].imag
    return np.array([x + mid, (difference + side) * undb(side_db)])


def scene():
    """All sources in the room, as left and right."""
    # the hands move off to one side as they ball the film up: [t/s, side re mid gain/dB]
    hands = [(0, 1.5), (1.2, -1.5), (2.5, -2), (3.0, -4), (3.5, 1.5), (3.95, 11), (4.4, 1.5)]
    # fingernail ticks on the card: [t/s, level/dB before the gain of clicks(), body re treble/dB before
    # its body_db, ring f/Hz]
    nail_ticks = [(4.8614, -31, -9, 4660), (4.9575, -34, -1, 4330), (5.5306, -33, -9, 4600),
                  (6.5342, -34.5, -30, 2930), (6.8241, -14, -3, 2400), (7.7905, -34, 4, 4950),
                  (7.93, -25, -8, 4540), (8.0715, -27, -17, 4120), (9.063, -32.5, 3, 4000),
                  (9.2113, -29, 1.5, 3980), (9.3817, -21, -19, 5900)]
    # width of the microphone pair: [f/Hz, gain of the side/dB]
    pair_width = [(60, -41), (200, -13), (380, -10), (700, 0), (1300, 1), (2400, 5), (4400, 4.5), (8000, 7),
                  (13000, 10)]
    # the hard contact of a knock: tick re clack column, body re treble (before body_db), ring
    contact_db, contact_body_db, contact_hz = -16.5, -1.5, 2760

    high, low = crinkle()
    # creases lie all across the film; their treble is the most directional
    high = room(high, wet_db=-5, side_db=-0.5, bearing=0.21 + 0.85 * walk(500))
    high = high * undb(curve(hands, 1) * np.array([[-.5], [.5]]))
    low = room(low, wet_db=-7.5, side_db=-5.5, bearing=-.2 + 1.05 * walk(500))
    snaps = clicks(FILM_SNAPS, smear_s=0.0005, shiver_db=-8.5, shiver_t60=0.017, gain_db=-1.5, body_db=-1)
    contacts = [(s, db + clack + contact_db, contact_body_db, contact_hz)
                for s, db, hz, thump, clack, freedom in BOX_KNOCKS]
    ticks = clicks([*nail_ticks, *contacts], smear_s=0.00055, shiver_db=-1.5, shiver_t60=0.032,
                   gain_db=-2.5, body_db=-1)
    mix = high + low
    mix = mix + room(snaps, wet_db=-6.0, side_db=-3, bearing=-0.71)
    mix = mix + room(knocks(), wet_db=-12.0, side_db=-2.5, bearing=0.41)
    mix = mix + room(ticks + brush() + swishes(), wet_db=-7.5, side_db=4.5, bearing=-0.22)
    tray = creak() + slide() + skid() + squeaks()
    mix = mix + room(tray, wet_db=-6.0, side_db=-2.0, bearing=-0.2)
    mid, side = mix + room_tone()
    side = colour(side, pair_width)
    return np.array([mid + side, mid - side])


def record(dry):
    """The two capsules differ slightly in colour; peaks beyond full scale clip; the top is cut."""
    # mismatch of the capsules: [f/Hz, left minus right/dB]
    capsule_tilt = [(800, 0), (1200, -1), (1900, -3.5), (4200, -1.5), (6000, 0)]
    top_hz = 15600
    heard = []
    for x, sign in zip(dry, (1, -1)):
        heard.append(colour(x, [(hz, sign * db / 2) for hz, db in capsule_tilt]))
    top_cut = signal.ellip(8, .2, 70, top_hz, fs=SR, output="sos")
    return signal.sosfilt(top_cut, np.clip(heard, -1, 1))


dry = scene()
out = record(dry)
generate_wav(out)
```